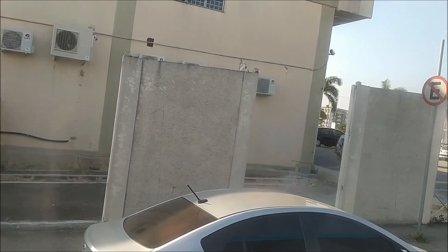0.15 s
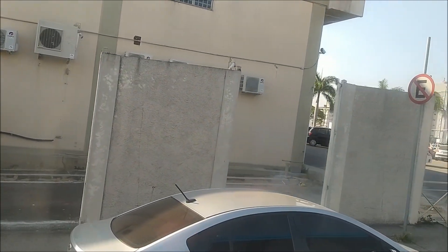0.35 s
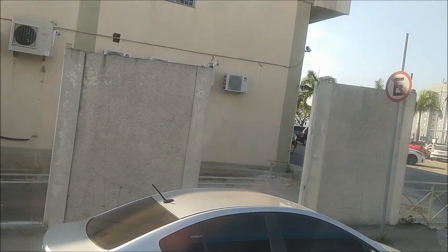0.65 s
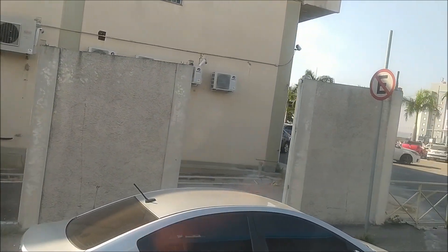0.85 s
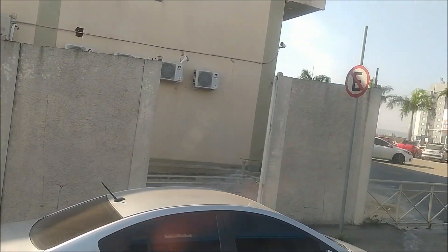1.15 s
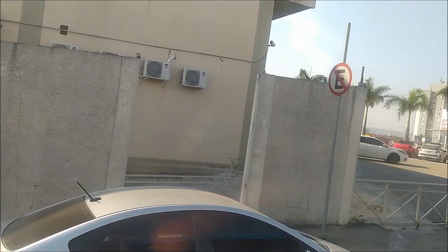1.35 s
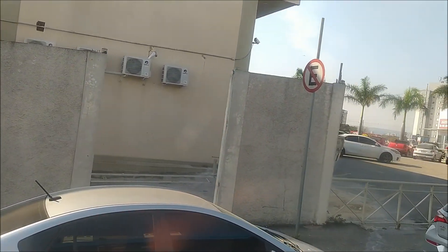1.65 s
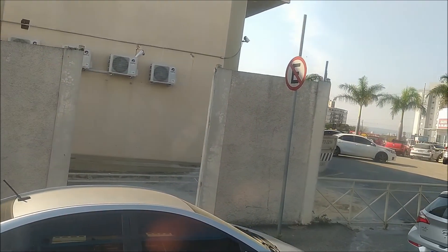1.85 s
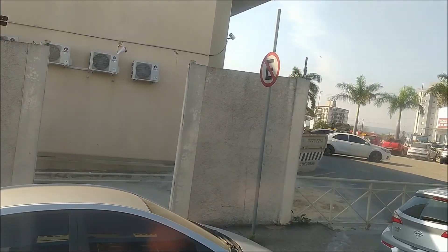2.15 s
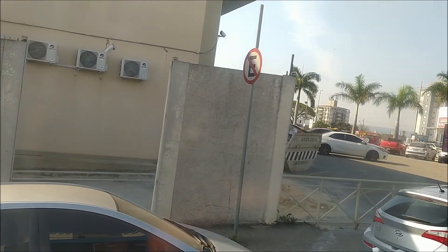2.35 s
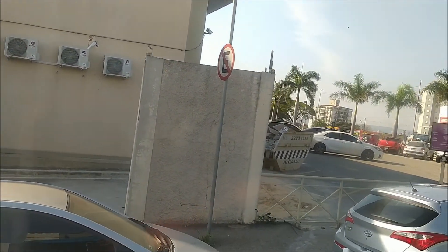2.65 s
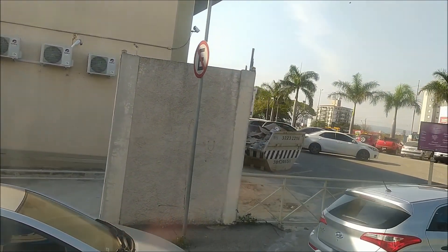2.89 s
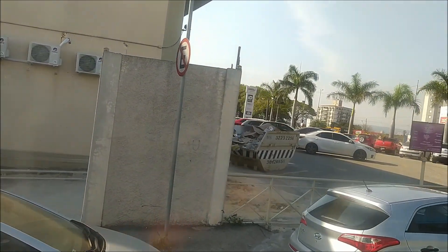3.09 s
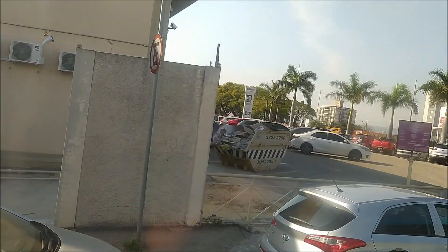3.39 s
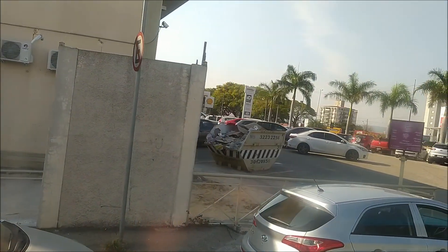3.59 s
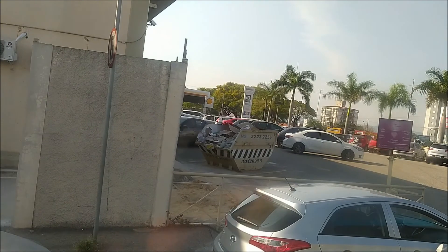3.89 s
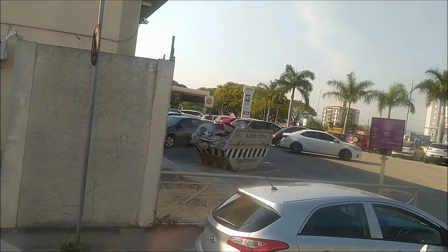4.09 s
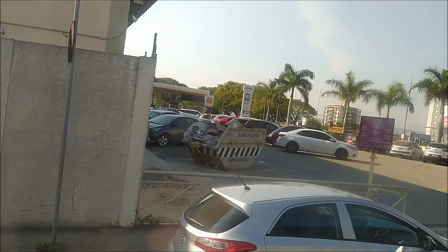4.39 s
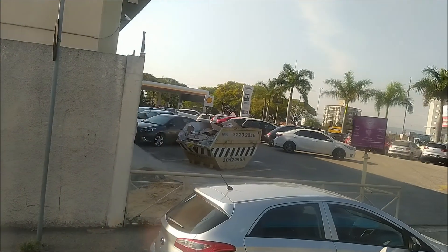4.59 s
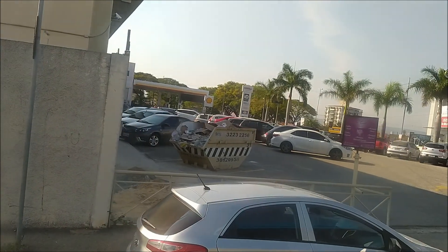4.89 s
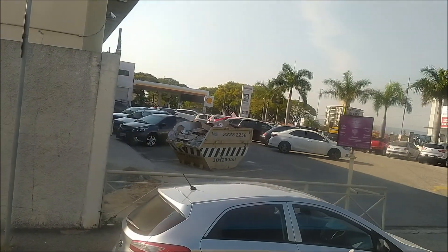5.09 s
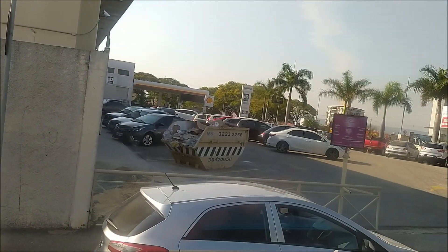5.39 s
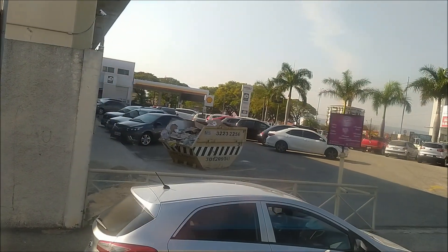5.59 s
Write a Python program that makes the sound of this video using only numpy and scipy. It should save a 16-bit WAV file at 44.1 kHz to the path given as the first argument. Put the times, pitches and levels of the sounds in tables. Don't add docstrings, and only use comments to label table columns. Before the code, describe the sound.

A close, boomy cabin sound: a diesel engine under moderate load slows in gear, with faint valve clatter, gear whine, vent hiss and small dry rattles over bumps. The pitch then drops to idle, where the throb gently swells and the rumble quietens. Late on, an air valve vents briefly and whistles shut, slightly left. A phone at the side window captures it.

```python
import sys
import numpy as np
from scipy import signal
from scipy.fft import rfft, irfft, next_fast_len
from scipy.io import wavfile
from scipy.ndimage import uniform_filter1d

SR = 44100
rng = np.random.default_rng(int(sys.argv[2]) if len(sys.argv) > 2 else 0)


def undo_db(level):
    steps = np.asarray(level, float) / 20
    return 10 ** steps


def dump(signal):
    limited = np.clip(np.atleast_2d(signal).T, -1, 1)
    pcm = np.round(limited * 32767).astype(np.int16)
    wavfile.write(sys.argv[1], SR, pcm)


N = 253117
T = np.arange(N) / SR
SIGN = np.array([[1], [-1]])
STEP = 64
IDLE_HZ = 28.9

# t/s, firing rate f/Hz, load level/dB
ENGINE_RUN = [(0.0, 56, -1), (0.42, 55.8, -0.5), (0.63, 53.1, 0), (0.89, 51.1, 0), (1.01, 49.3, -2),
              (1.14, 48.8, 0), (1.5, 46.09, 0), (1.9, 44.95, 0), (2.33, 43.5, 0), (2.5, 42.61, -5.5),
              (2.64, 40.08, -3), (2.88, 37.98, -2), (3.12, 33.19, -2.5), (3.27, 29.82, -1),
              (3.4, 28.92, 0.5), (3.6, 28.86, 1.5), (4.7, 29, -1.5), (5.74, 28.75, -2.5)]
# level at idle/dB, slope/dB per octave
CLATTER_WITH_SPEED = (-46.5, 9.07)


def curves(table):
    s, *columns = np.transpose(table)
    return [np.interp(T, s, column) for column in columns]


def gain_at(table, hz):
    f, db = np.transpose(table)
    return np.interp(np.log(hz + 1e-9), np.log(f), db)


def walk(rate):
    hold = max(int(SR / rate), 1)
    held = np.repeat(rng.standard_normal(N // hold + 1), hold)
    return 1.34 * uniform_filter1d(uniform_filter1d(held, hold), hold)[:N]


def slow_gain(db):
    return np.interp(T, T[::STEP], undo_db(db))


def law(at_idle_db, slope_db, hz):
    return at_idle_db + slope_db * np.log2(hz / IDLE_HZ)


def passing(table, hz, floor_db):
    tops = [undo_db(db) ** 2 / (1 + ((hz - top_hz) / half_width) ** 2) ** 2 for top_hz, half_width, db in table]
    return 10 * np.log10(undo_db(floor_db) ** 2 + sum(tops))


def swells_at(table):
    return sum(height * np.exp(-.5 * ((T - s) / length) ** 2) for s, height, length in table)


def noise(colour, db, width_db=0.):
    # f/Hz, side minus mid level/dB
    mic_width = [(60, -30), (110, -3.5), (200, -10), (370, -8), (670, 1), (1220, 3.5), (2240, 0), (4090, 0),
                 (7470, -2), (13700, 0.5)]
    # f/Hz, left minus right level/dB
    mic_lean = [(60, 0), (110, -.5), (200, -1.5), (370, -2), (670, .5), (1220, -4.5), (2240, -.5),
                (4090, 1), (7470, -1), (10000, 0), (13700, 3)]
    size = next_fast_len(N)
    hz = np.arange(size // 2 + 1) * SR / size
    mid, side = rfft(rng.standard_normal((2, size)))
    late = 0.75 / (1 + (hz / 900) ** 2)
    side = np.sqrt(1 - late ** 2) * side - 1j * late * mid
    shape = undo_db(gain_at(colour, hz)) * (hz < colour[-1][0]) * (hz > colour[0][0])
    both = mid + SIGN * side * undo_db(gain_at(mic_width, hz) + width_db)
    both = both * undo_db(SIGN * gain_at(mic_lean, hz) / 2)
    scale = np.sqrt(np.mean(irfft(mid * shape, size) ** 2))
    return irfft(both * shape, size)[:, :N] * undo_db(db) / scale


def note(s, from_hz, to_hz, db, shape):
    times = np.maximum(s + np.cumsum([0, *np.abs(shape)]), 0)
    levels = db + np.array([-24, -2.5, 0, -5, -25])
    return list(zip(times, [from_hz, from_hz, to_hz, to_hz, to_hz], levels))


def grainy_tone(width_hz, rows, across_db):
    span = slice(int(rows[0][0] * SR), int(rows[-1][0] * SR))
    hz, db = (column[span] for column in curves(rows))
    slow = signal.butter(2, width_hz, fs=SR, output="sos")
    spread = signal.sosfilt(slow, rng.standard_normal((2, 2, SR)))
    spread = spread[..., ::-1][..., :len(hz)] / np.sqrt(np.mean(spread ** 2))
    carrier = np.exp(2j * np.pi * np.cumsum(hz) / SR)
    mid, side = np.real(carrier * (spread[0] + 1j * spread[1]))
    out = np.zeros((2, N))
    out[:, span] = undo_db(db) * (mid + SIGN * undo_db(across_db) * side)
    return out


def blower(speed_hz, clatter_db):
    # f/Hz, level/dB per Hz
    hiss = [(1940, -17), (3300, -6.5), (3770, -3.5), (5110, -4), (6020, -5.5), (8470, -3), (9980, 1),
            (11100, 1), (12200, -9), (14100, -17)]
    # level at idle/dB, slope/dB per octave
    hiss_with_speed = (-59.5, 8.1)
    # f/Hz, level/dB
    fan_tones = [(650, -56.5), (1930, -73), (2024, -65)]
    out = noise(hiss, law(*hiss_with_speed, speed_hz) + 1.06 + .5 * walk(11))
    for hz, db in fan_tones:
        wander = np.cumsum(1 + 0.003956 * walk(11)) / SR
        level_db = db + 0.87 * (clatter_db + 46.5) + 1.5 * walk(5.97)
        out += undo_db(level_db) * np.sin(2 * np.pi * hz * wander)
    return out


def floor_and_panels(speed_hz, clatter_db):
    # f/Hz, level/dB per Hz
    rumble = [(8, -20), (14, -9), (25, -4), (40, 0), (70, -6), (85, 2.5), (105, -3.5), (125, -7.5),
              (140, -27)]
    boom = [(120, -32), (135, -7), (145, 1.5), (155, -4), (167, -1.5), (190, -4.5), (205, -10), (230, -36)]
    drone = [(190, -31), (215, 0), (245, -3.5), (272, -2), (300, -2.5), (340, -11), (372, -4), (400, -12),
             (450, -10.5), (500, -18), (560, -29.5)]
    # level at idle/dB, slope/dB per octave
    boom_with_speed = (-38.5, 12.8)
    drone_with_speed = (-37.5, 10.06)
    # t/s, extra boom level/dB, length/s
    rough_road = [(.05, 2, 0.11), (.5, 3.5, 0.11), (2.8, 5, .13), (3.55, 4, .15), (4.25, 4, .2)]
    # t/s, from f/Hz, to f/Hz, level/dB, width/Hz
    bumps = [(-.05, 145.5, 161, -20, 4.8), (.86, 139, 142.5, -28.5, 5), (1.2, 143, 143, -34, 5)]
    # attack/s, glide/s, hold/s, release/s
    bump_shape = (0.068, .1, .08, .12)
    out = noise(rumble, 0.82 * (clatter_db + 47.5) - 39.5 + .8 * walk(3.1), -3.5)
    out += noise(boom, law(*boom_with_speed, speed_hz) + swells_at(rough_road) + .5 * walk(7), -3)
    out += noise(drone, law(*drone_with_speed, speed_hz) - 0.5 + 0.21 * walk(11))
    for *row, width_hz in bumps:
        out += grainy_tone(width_hz, note(*row, bump_shape), -17)
    return out


def valve_clatter(clatter_db, turn):
    # f/Hz, level/dB per Hz
    clatter = [(280, -51.5), (480, -3.5), (522, -4.5), (603, -4.5), (763, -10), (1030, -8.5), (1220, -20.5),
               (1400, -14), (1510, -17.5), (1710, -17.5), (1790, -18.5), (1960, -16), (2530, -23),
               (3150, -28), (3600, -31), (4680, -55), (7920, -120)]
    throb = 1 + 0.046 * np.cos(turn) + 0.017 * np.cos(turn / 2)
    return throb * noise(clatter, clatter_db + 0.14 * walk(5.06))


def rattles():
    # t/s, level/dB, length/s
    bursts = [(.38, -56, 0.051), (.62, -59, .04), (1.081, -57, 0.059), (1.301, -56, 0.025),
              (1.448, -56.5, .05), (2.298, -62, 0.041), (2.42, -60, .03), (2.55, -61, .03),
              (2.85, -63, .02), (3.301, -59, .015), (3.548, -69, 0.032), (4.1, -72, .08),
              (4.621, -66, 0.014)]
    # f/Hz, level/dB per Hz
    ticks = [(3000, -20), (4500, -3.5), (7000, 0), (10500, 5.5), (12000, -6), (14300, -16)]
    size = swells_at([(s, undo_db(db), length) for s, db, length in bursts])
    return size * undo_db(2.7 * walk(60)) * noise(ticks, 0)


def air_valve():
    # start t/s, attack/s, hold/s, level/dB, release/dB per s
    vent = (4.805, .015, 0.25, -53.5, 70)
    # f/Hz, level/dB per Hz
    vent_air = [(4000, -31), (5500, -5), (7500, -4), (9000, -2.5), (10800, 1), (11800, -8), (14300, -24)]
    # t/s, from f/Hz, to f/Hz, level/dB, width/Hz
    squeals = [
        (5.06, 7880, 7300, -50, 150),
        (5.122, 6320, 6170, -50, 130),
        (5.085, 7500, 6600, -55.5, 450),
    ]
    # attack/s, glide/s, hold/s, release/s
    squeal_shape = (.03, .045, .045, .13)
    s, attack, hold, db, release_db = vent
    open_share = np.clip((T - s) / attack, 0, 1)
    air = open_share * noise(vent_air, db - release_db * np.maximum(T - s - attack - hold, 0))
    whistles = sum(grainy_tone(width_hz, note(*row, squeal_shape), -1.5) for *row, width_hz in squeals)
    return air + undo_db(0.98 * SIGN) * whistles


def gear_whine(hz, turn):
    # f/Hz, half width/Hz, level/dB
    case = [(1990, 12, -60), (1920, 10, -62), (1891, 13, -53.5), (1845, 20, -61)]
    teeth = 41.7
    db = passing(case, teeth * hz, -80) + walk(8.78)[::STEP]
    return slow_gain(db) * np.sin(teeth * turn)


def idle_swell():
    # mean level/dB, depth/dB, period/s, loudest at t/s
    swells = [
        (-1, 5, 1.3, 4.36),
        (-.5, 6, 1.42, 4.85),
        (0, 6, 1.8, 5.32),
    ]
    t = T[::STEP]
    idling = np.clip((t - 3.2) / .3, 0, 1)
    return {order: idling * (db + depth_db * np.cos(2 * np.pi * (t - s) / period))
            for order, (db, depth_db, period, s) in zip((3, 5, 6), swells)}


def low_orders(hz, effort_db, turn, swell):
    # f/Hz, half width/Hz, rms level at the top/dB
    order_booms = [
        [(51.3, 3.5, -26), (45.7, 1.5, -27), (29, 1.8, -30)],
        [(109, 8, -25), (93.34, 2, -24.5), (88.8, 1.64, -22), (85.9, 2.6, -22)],
        [(165, 2.6, -23.5), (157.2, 1.6, -23), (143, 1.6, -28.5), (115.3, 4, -36), (87, 4, -38)],
        [(222, 4, -30.5), (208.8, 4.3, -20.5), (190.8, 8.2, -26), (180.57, 2.97, -18), (175.3, 3.3, -19.5),
         (156, 3, -27)],
    ]
    sideways_booms = [(221, 3.8, -26.5), (209, 3, -30), (183, 8, -37)]
    # order, f/Hz, half width/Hz, rms level at the top/dB
    half_booms = [(1.5, 84, 3, -33), (3.5, 195, 5, -32), (4.5, 252, 5, -36)]
    off_boom_db = [-33, -37.5, -44, -44]
    load_share = [1.1, 0.38, .8, 2.2]
    # difference between the microphones, level/dB
    across_db = [-18, -26, -17, -31]
    sideways = slow_gain(passing(sideways_booms, 4 * hz, -64))
    mid = 0
    side = sideways * np.cos(4 * turn + 4.9)
    for i, booms in enumerate(order_booms):
        order = i + 1
        db = passing(booms, order * hz, off_boom_db[i]) + load_share[i] * effort_db + swell.get(order, 0)
        size = slow_gain(db + 0.5 * walk(9.8)[::STEP])
        phase = order * turn + np.pi / 2 + .7 * i
        mid = mid + size * np.sin(phase)
        side = side - undo_db(across_db[i]) * size * np.cos(phase)
    for order, *boom in half_booms:
        mid = mid + slow_gain(passing([boom], order * hz, -70)) * np.sin(order * turn)
    return mid, side


def high_orders(hz, turn, swell):
    # f/Hz, level/dB
    along = [(120, -40.5), (145, -38.5), (172, -36.5), (200, -46.5), (232, -50), (270, -46.5), (320, -56),
             (345, -53.5), (372, -47), (400, -55.5), (450, -61.5)]
    across = [(120, -62), (160, -61.5), (190, -54), (205, -58), (218, -43), (232, -52), (260, -68),
              (350, -56.5), (450, -64)]
    load_db = law(0, 5, hz)
    mid = side = 0
    for order in np.arange(4.5, 15.5, .5):
        start, lag = rng.uniform(0, 2 * np.pi, 2)
        line_hz = order * hz
        db = load_db - 5.5 * (order % 1 > 0)
        db = db + swell.get(order, 2.1 * walk(3)[::STEP]) - 60 * (line_hz > along[-1][0])
        mid = mid + slow_gain(db + gain_at(along, line_hz)) * np.sin(order * turn + start)
        side = side + slow_gain(db + gain_at(across, line_hz)) * np.sin(order * turn + lag)
    return mid, side


def engine():
    hz, effort_db = curves(ENGINE_RUN)
    turn = 2 * np.pi * np.cumsum(hz * (1 + .001 * walk(4))) / SR
    hz, effort_db = hz[::STEP], effort_db[::STEP]
    swell = idle_swell()
    low_mid, low_side = low_orders(hz, effort_db, turn, swell)
    high_mid, high_side = high_orders(hz, turn, swell)
    mid = low_mid + high_mid + gear_whine(hz, turn)
    return np.sqrt(2) * (mid + SIGN * (low_side + high_side)), turn


def scene():
    lines, turn = engine()
    speed_hz = curves(ENGINE_RUN)[0]
    clatter_db = law(*CLATTER_WITH_SPEED, speed_hz)
    steady = blower(speed_hz, clatter_db) + floor_and_panels(speed_hz, clatter_db)
    return steady + valve_clatter(clatter_db, turn) + rattles() + air_valve() + lines


def drop_patches(x):
    # f/Hz, share [0-1]
    dropout = [(2500, 0), (3500, .13), (4500, .22), (6200, .24), (8000, .17), (9200, .07), (11300, .01),
               (12300, .3), (13500, .42), (14500, .5)]
    hz, _, z = signal.stft(x, SR, nperseg=2048, noverlap=1024)
    bands = rng.standard_normal((len(hz) // 7 + 1, z.shape[-1]))
    held = uniform_filter1d(bands, size=3, axis=1) * np.sqrt(3)
    rank = np.repeat(1 / (1 + np.exp(-1.7 * held)), 7, axis=0)[:len(hz)]
    power = uniform_filter1d(np.sum(abs(z) ** 2, axis=0), size=15, axis=0)
    quiet = power < 3 * np.median(power, axis=1, keepdims=True)
    share = gain_at(dropout, hz)[:, None] * quiet
    kept = z * (rank > share) / np.sqrt(1 - share)
    return signal.istft(kept, SR, nperseg=2048, noverlap=1024)[1][:, :N]


def band_limit(x):
    return signal.sosfilt(signal.butter(12, 14260, fs=SR, output="sos"), x)


def record(dry):
    limit = .7
    opened = dry * np.minimum(T / .004, 1)
    rounded = limit * np.tanh(opened / limit)
    return band_limit(drop_patches(rounded))


dry = scene()
out = record(dry)
dump(out)
```